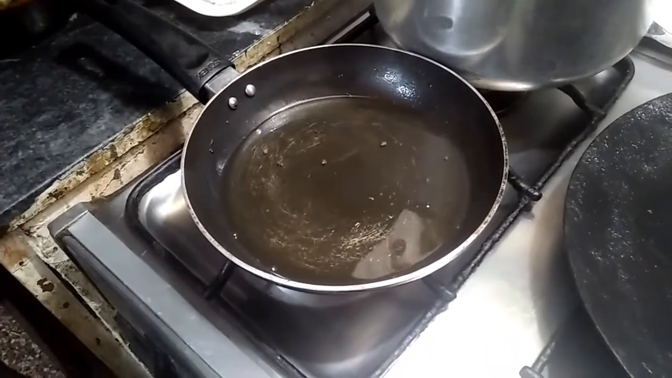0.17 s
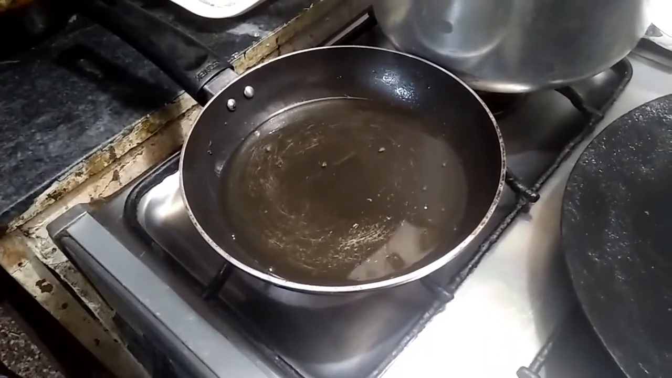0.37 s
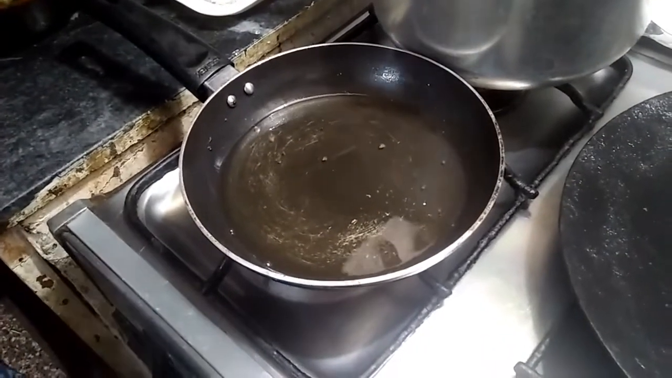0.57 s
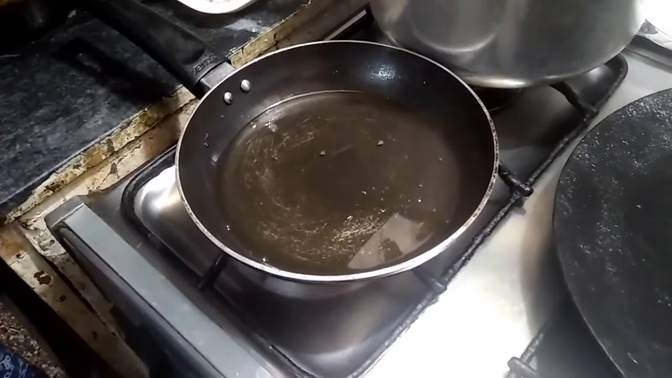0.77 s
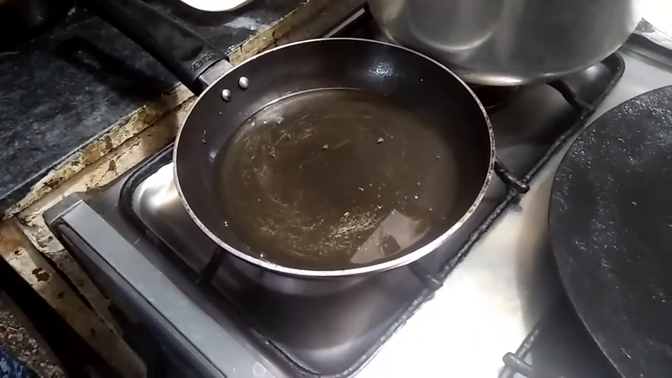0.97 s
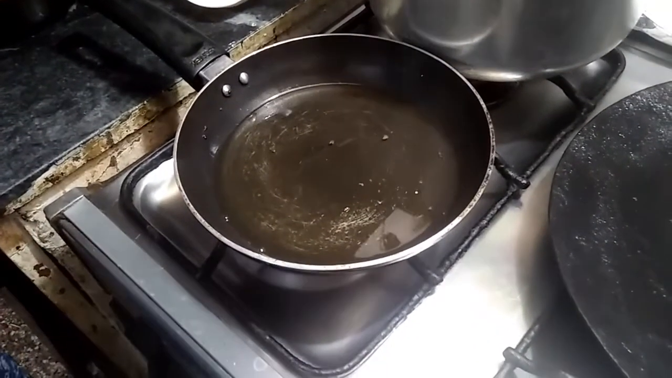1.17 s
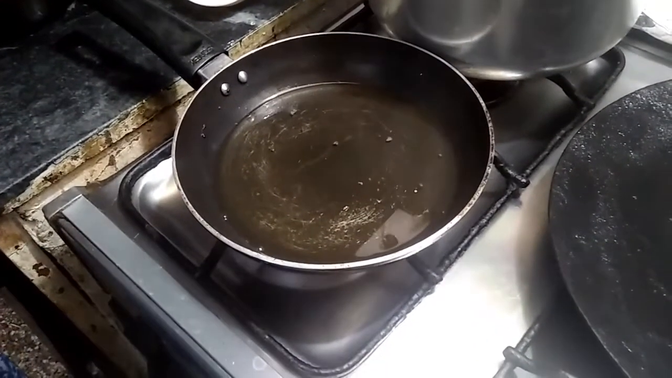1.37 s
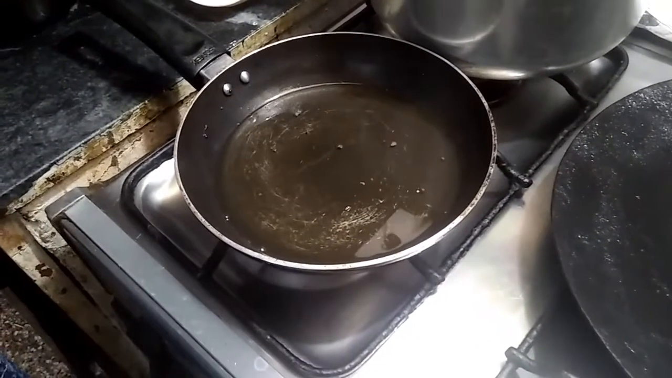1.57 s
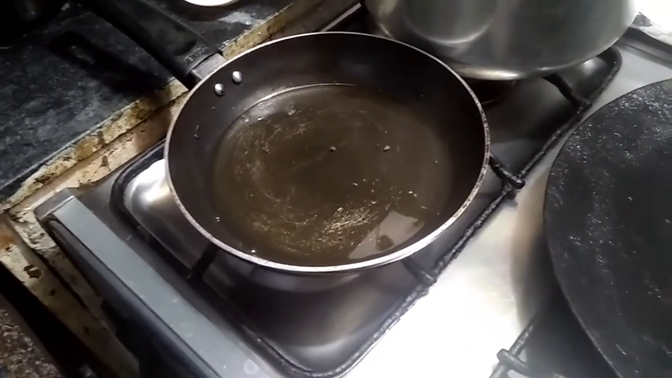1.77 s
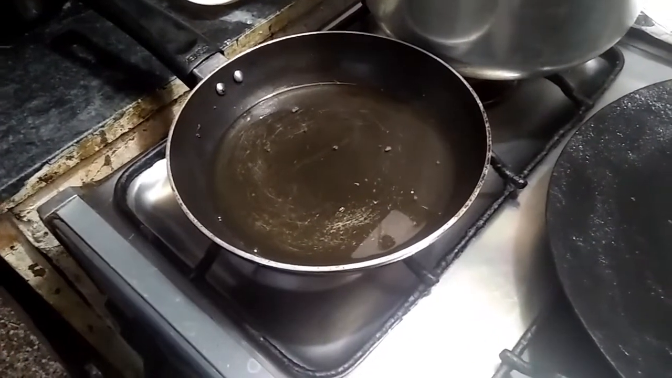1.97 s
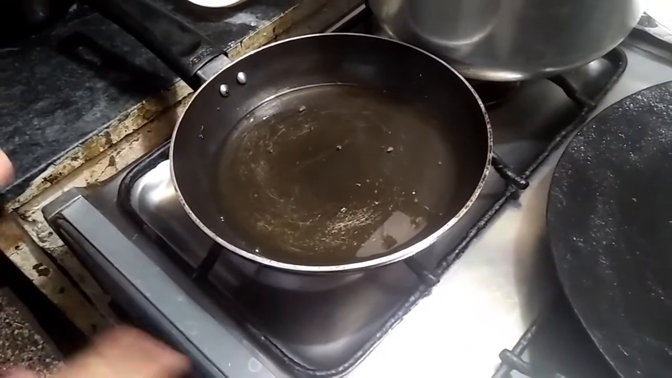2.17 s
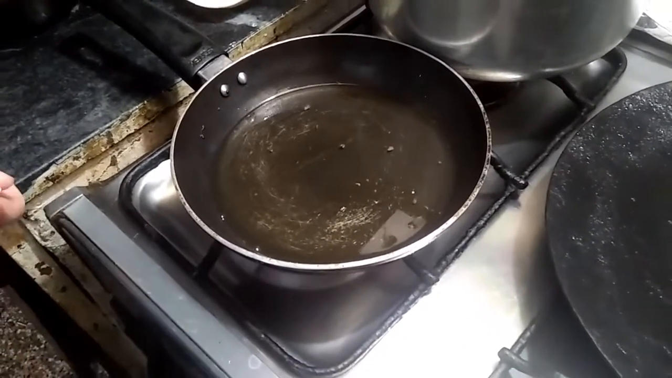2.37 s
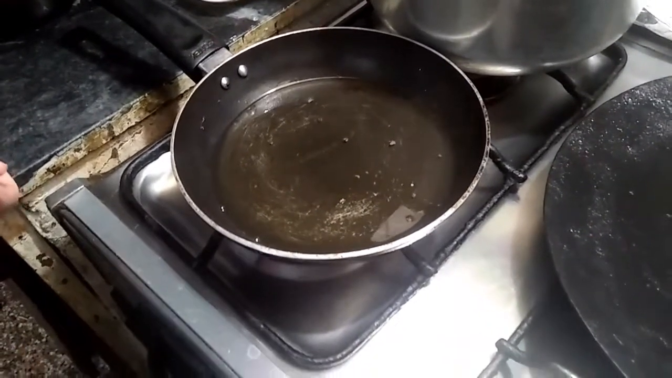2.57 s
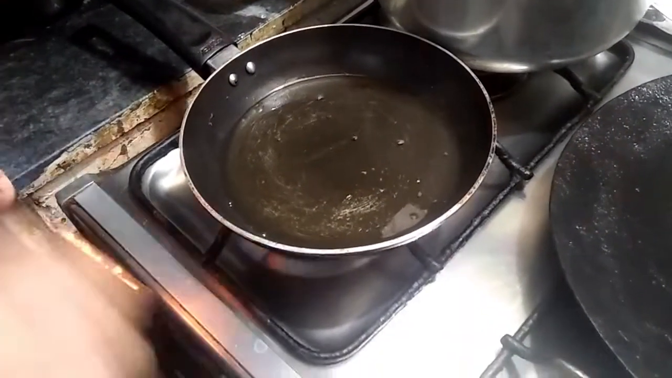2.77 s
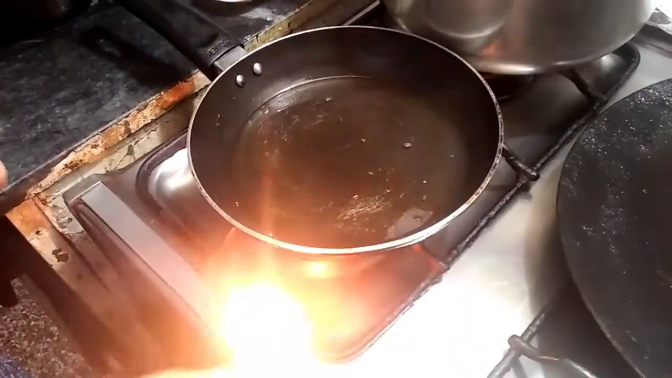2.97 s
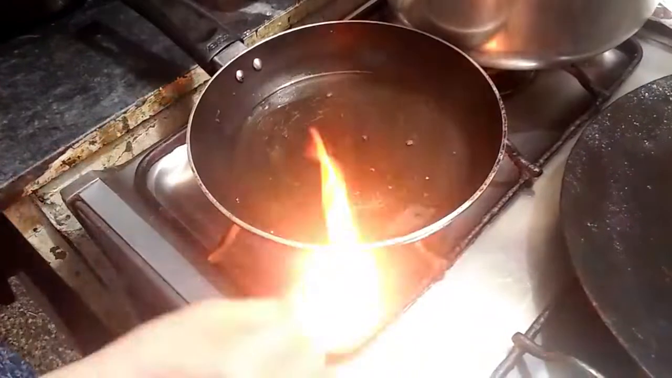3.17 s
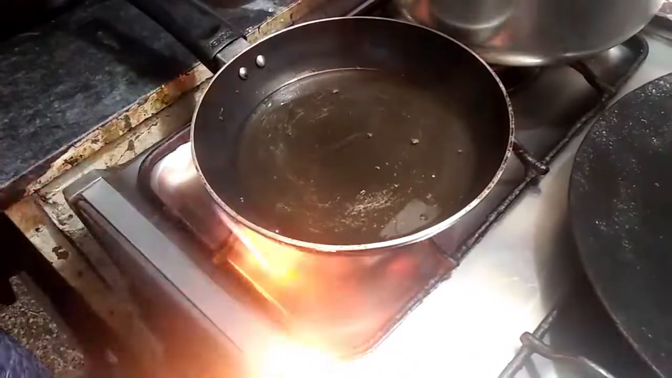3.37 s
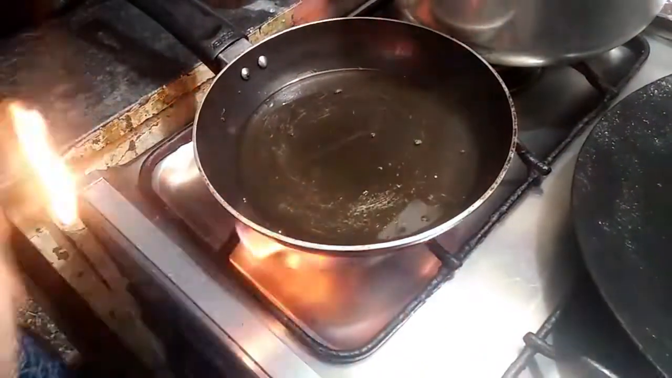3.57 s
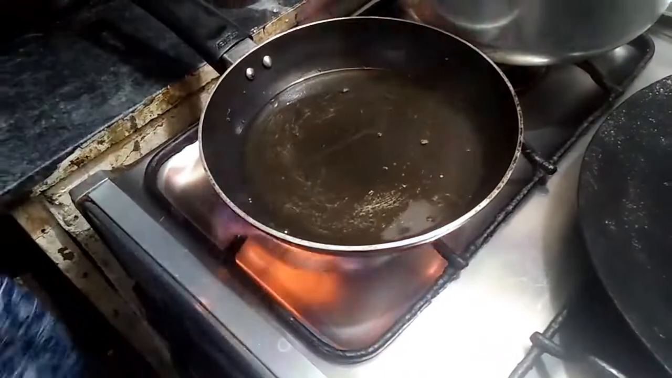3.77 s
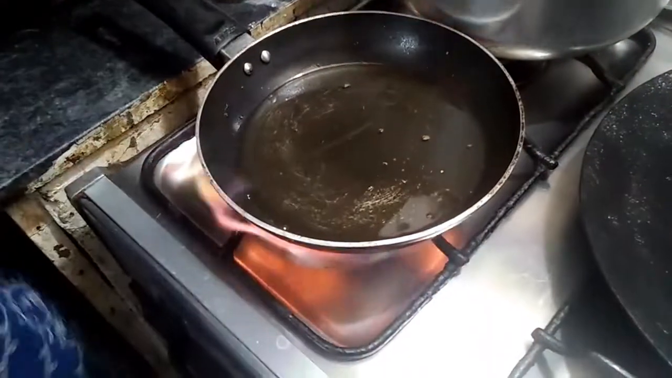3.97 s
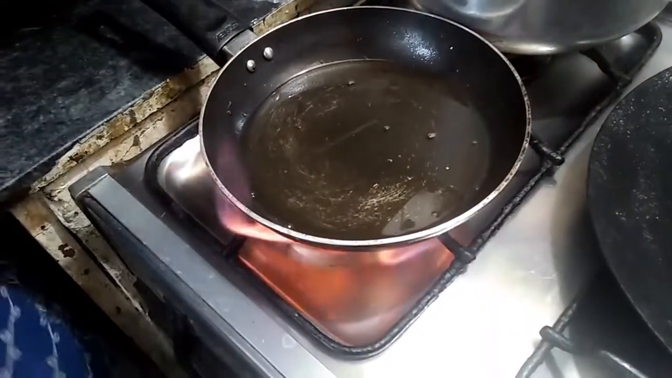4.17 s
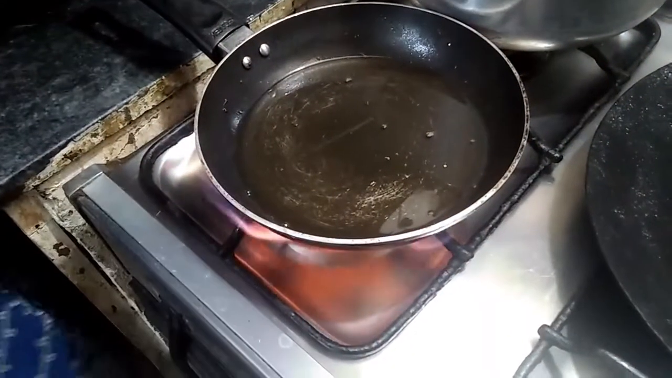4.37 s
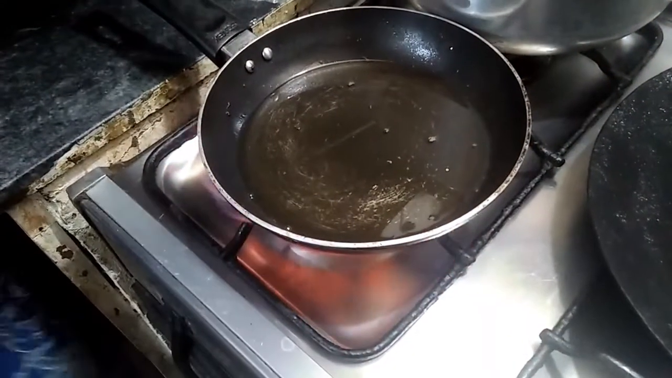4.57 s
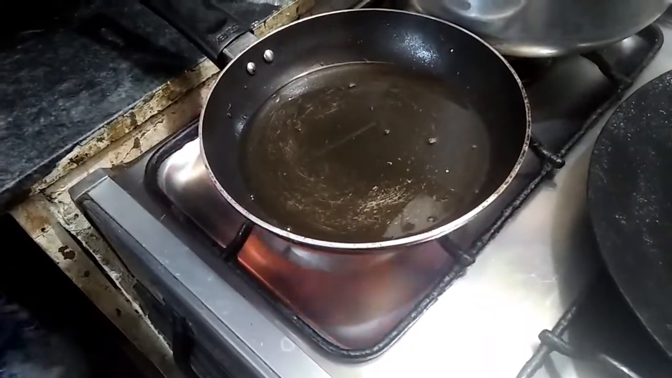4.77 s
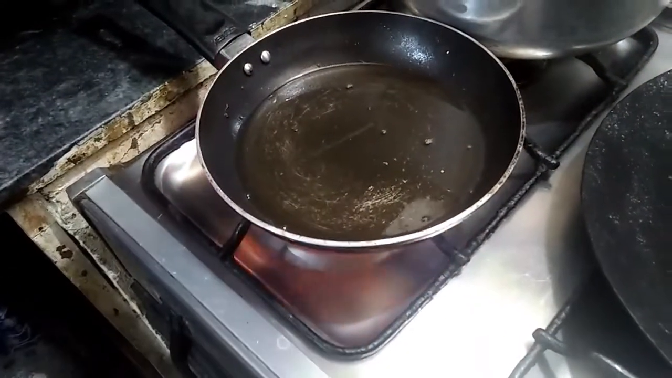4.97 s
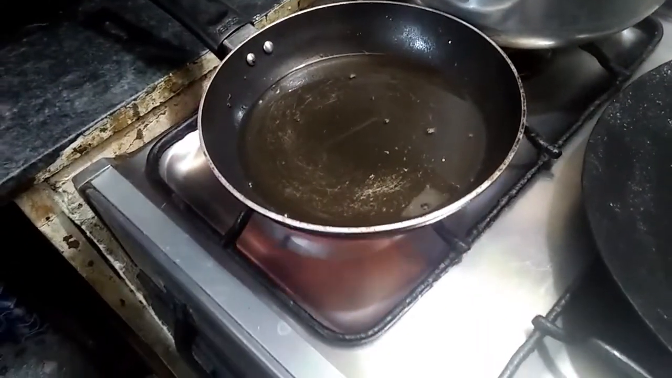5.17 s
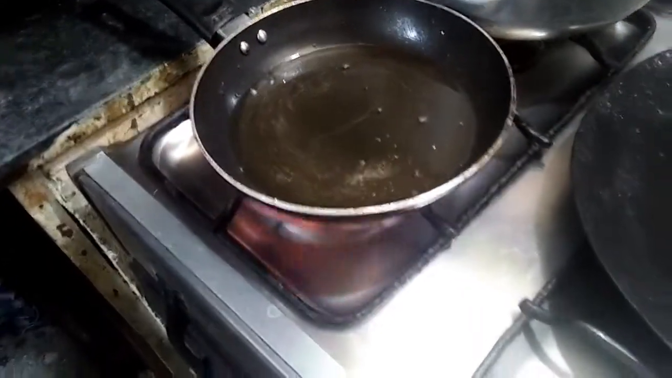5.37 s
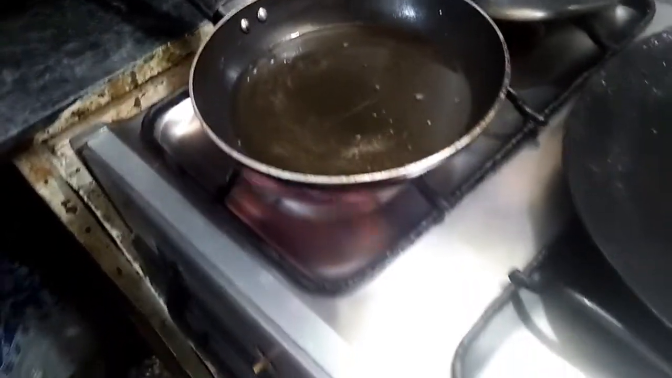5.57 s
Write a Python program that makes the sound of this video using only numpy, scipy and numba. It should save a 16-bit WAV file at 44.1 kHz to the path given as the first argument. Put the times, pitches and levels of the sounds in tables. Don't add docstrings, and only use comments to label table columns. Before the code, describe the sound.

In a small tiled kitchen, a cardboard matchbox rattles, gas hisses, a match is struck and the burner whumps alight under a pan.

```python
import sys
import numpy as np
from scipy import signal
from scipy.fft import rfft, irfft, next_fast_len
from scipy.io import wavfile
from scipy.ndimage import uniform_filter1d
from numba import njit

SR = 44100
rng = np.random.default_rng(int(sys.argv[2]) if len(sys.argv) > 2 else 0)


def natural_amplitude(level_db):
    exponent = np.asarray(level_db, float) / 20
    return 10 ** exponent


def master_out(mix):
    frames = np.transpose(np.atleast_2d(mix))
    ceiling = np.clip(frames, -1, 1)
    pcm = np.round(ceiling * 32767).astype(np.int16)
    wavfile.write(sys.argv[1], SR, pcm)


N = 247401
TIME = np.arange(N) / SR
STROKE_DROP_DB = 30


def unit(x):
    return x / np.sqrt(np.mean(x ** 2))


def noise():
    return rng.standard_normal(N)


def colour(x, points):
    hz, db = np.transpose(points)
    size = next_fast_len(len(x))
    bins_hz = np.arange(size // 2 + 1) * SR / size
    gain = natural_amplitude(np.interp(np.log(bins_hz + 1), np.log(hz), db))
    return unit(irfft(rfft(x, size) * gain, size)[:len(x)])


@njit
def svf(x, hz, width):
    y, b, l = np.empty(len(x)), 0., 0.
    for i in range(len(x)):
        g, k = np.tan(np.pi * hz[i] / SR), width / hz[i]
        v = (b + g * (x[i] - l)) / (1 + g * (g + k))
        b, l, y[i] = 2 * v - b, l + 2 * g * v, k * v
    return y


def band(x, hz, width):
    return signal.lfilter(*signal.iirpeak(hz, hz / width, fs=SR), x)


def steep(x, hz, width):
    return unit(band(band(x, hz, width), hz, 2.1 * width))


def even(x, seconds, share):
    return unit(x / uniform_filter1d(np.abs(x), int(seconds * SR)) ** share)


def walk(rate):
    k = max(int(SR / rate), 20)
    held = rng.standard_normal(N // 20)[np.arange(N) // k]
    return unit(uniform_filter1d(uniform_filter1d(held, k), k))


def mottled(x, low_hz, depth_db, rate):
    centres = low_hz * 1.25 ** np.arange(5)
    return unit(sum(natural_amplitude(depth_db * walk(rate)) * band(x, hz, hz / 5) for hz in centres))


def curve(rows, column, silent):
    rows = np.array(rows)
    out = np.full(N, 1. * silent)
    inside = (TIME >= rows[0, 0]) & (TIME <= rows[-1, 0])
    out[inside] = np.interp(TIME[inside], rows[:, 0], rows[:, column])
    return uniform_filter1d(out, size=40)


def place(out, s, sound):
    start = int(s * SR)
    out[start:start + len(sound)] += sound[:N - start]


def hump(peak_s, rise_s, fall_s):
    early = TIME < peak_s
    away = np.where(early, (peak_s - TIME) / max(rise_s, .003), (TIME - peak_s) / max(fall_s, .003))
    return -STROKE_DROP_DB * away ** np.where(early, 2.12, 1.26)


# peak t/s, rise t/s, fall t/s, level/dB, coarse grit level/dB
STROKES = [(.055, .008, 0.035, -64.5, -5), (.115, 0.047, 0.13, -59, -9), (0.188, 0.0094, 0.036, -36.5, -4.5),
           (.24, 0.11, 0.28, -48, 0), (.3, 0.16, 0.071, -47, -16), (.37, 0.02, 0.034, -65, -1),
           (.49, 0.049, 0.3, -65, -8), (0.537, 0.022, 0.23, -50, -1.5), (0.592, 0.039, 0.021, -55, 11),
           (.61, .015, 0.068, -68, 0), (.707, .008, .06, -56, -3), (0.733, 0.033, 0.07, -46.5, -4),
           (.775, 0.077, 0.16, -45.5, -2.5), (.83, 0.035, 0.093, -48, -5), (.88, 0.11, 0.019, -57.5, -10),
           (2.142, 0.03, 0.14, -45, -5), (2.199, 0.1, 0.066, -44, -0.5), (2.27, 0.046, 0.27, -56.5, -3),
           (3.391, 0.049, 0.087, -46, -1.5), (4.04, 0.035, 0.14, -52, -9), (4.099, 0.037, 0.27, -45.5, -19),
        (4.209, 0.01, 0.07, -67, -7), (4.232, 0.028, .025, -60, -9), (4.27, .04, 0.19, -63.5, -6),
        (4.333, 0.035, 0.057, -55.5, -2), (4.42, 0.11, 0.041, -58, -6), (4.49, 0.11, 0.11, -54, -4.5),
        (4.8, 0.062, .1, -57.5, -3.5), (4.84, 0.14, 0.2, -51.5, -6.5), (4.922, 0.095, 0.11, -45, -10.5),
        (4.97, 0.1, 0.076, -49, -2), (5.02, 0.078, 0.13, -56, -1), (5.123, 0.021, 0.17, -54.5, -12),
        (5.16, .04, 0.026, -66, -7), (5.35, 0.043, 0.14, -58.5, -9)]


def effort(lingers, gritty, head_db=0):
    head_grit_db = -3 + curve(FIZZ, column=2, silent=0)
    power = natural_amplitude(head_db + curve(FIZZ, column=1, silent=-120) + gritty * head_grit_db) ** 2
    for s, rise_s, fall_s, db, grit_db in STROKES:
        near = slice(max(int((s - .3) * SR), 0), int((s + .5) * SR))
        stroke_db = hump(s, rise_s, fall_s * lingers)[near]
        power[near] += natural_amplitude(db + gritty * grit_db + stroke_db) ** 2
    return np.sqrt(power)


# f/Hz, level/dB
FINE_COLOUR = [(5500, -31), (6800, -9.5), (8000, -1.5), (9700, 2), (11600, -6), (14200, -12.5),
               (16000, -29)]
# f/Hz, level/dB
COARSE_COLOUR = [(2400, -44.5), (2950, 7), (4400, 9), (5600, 4), (6700, 8), (7700, -6), (9600, -41)]
# t/s, share
FLARE = [
    (2.93, .1),
    (3.0, .95),
    (3.34, 0.73),
    (3.37, 0.11),
    (3.45, 1),
    (5.6, 0.36),
]
# t/s, lid f/Hz, lid level/dB, hollow level/dB
GRIP = [(0, 1900, 2.5, -3), (.5, 1900, 0, -33), (.6, 2010, 4.5, -9), (.72, 1990, 0, -24),
        (.9, 1710, 0, -21), (2.15, 1880, 7, -8.5), (2.9, 1655, 4.5, -25), (3.2, 2280, 1.5, -26),
        (3.4, 1340, -0.5, 0.5), (3.75, 2100, 1.5, -4), (4.1, 1500, 1, -25), (4.4, 1877, 3.5, -2),
        (4.9, 1616, -2, -6.5), (5.2, 1890, 6, 3.5), (5.4, 1757, 6.5, 5.5)]


def rubbing():
    grit = noise() * natural_amplitude(0.88 * walk(500))
    fine = colour(mottled(grit, low_hz=5840, depth_db=5.5, rate=24), FINE_COLOUR)
    coarse = colour(mottled(grit, low_hz=3340, depth_db=4, rate=20), COARSE_COLOUR)
    coarse = coarse - curve(FLARE, column=1, silent=0) * band(coarse, 3970, 4700)

    lid_hz = np.clip(curve(GRIP, column=1, silent=2500), 500, 4000)
    upper = svf(svf(svf(grit, lid_hz, 560.0), lid_hz, 1400.0), lid_hz, 1400.0)
    lower = svf(svf(grit, 0.686 * lid_hz, 170.0), 0.55 * lid_hz, 240.0)
    lid = unit(unit(upper) + natural_amplitude(-7.5) * unit(lower))
    hollow = steep(grit, 820, 400)

    grip_s, _, lid_db, hollow_db = np.transpose(GRIP)
    box = lid * natural_amplitude(np.interp(TIME, grip_s, lid_db)) * effort(lingers=1.31, gritty=0)
    box += hollow * natural_amplitude(np.interp(TIME, grip_s, hollow_db)) * effort(lingers=1.88, gritty=0)
    return fine * effort(0.62, 0, head_db=-6) + coarse * effort(0.62, 0.87) + box


# f/Hz, level/dB
CRACK_COLOUR = [(1650, -21), (2800, 10), (3300, -16), (3860, -11), (6090, -5), (10300, 0.5), (13400, -39),
                (14300, -24)]
# t/s, peak level/dB, ring f/Hz, treble level/dB
TICKS = [(0.1062, -55, 2110, -60), (0.1438, -42, 1930, -33), (0.168, -33, 2000, -63),
         (0.1782, -31, 1860, -36), (.1865, -48, 1760, -16.5), (.1905, -30.5, 2360, -37),
         (.2348, -46, 2500, -27), (0.259, -25, 1910, -48), (.268, -31.5, 2140, -60),
         (0.278, -53, 1900, -60), (.2967, -36, 2300, -40), (.304, -45, 2340, -58), (.3548, -41, 2200, -60),
         (0.3713, -40, 2000, -57), (0.5322, -45, 1730, -50), (0.534, -47, 1770, -50),
         (0.579, -27.5, 1900, -40), (0.58, -37, 1110, -60), (0.5867, -28.5, 2420, -48),
         (0.593, -30, 2460, -51), (0.702, -41, 2070, -50), (.7129, -37, 1590, -50),
         (0.7713, -36, 1800, -30), (.778, -41, 1900, -50), (2.157, -30, 2180, -50),
         (2.1658, -36, 2320, -20), (2.2059, -36, 2220, -17), (3.5718, -46, 1480, -34),
         (4.024, -43, 2200, -44), (4.0472, -38, 1970, -56), (4.0975, -37, 1420, -23),
         (4.107, -43, 1400, -29), (4.114, -38, 1480, -50), (4.12, -39, 1350, -58), (4.2058, -40, 1970, -39),
         (4.328, -34.5, 1460, -61), (4.3825, -37.5, 2040, -60), (4.4457, -45, 1100, -37),
         (4.4905, -39, 1520, -40.5), (4.834, -41, 1540, -26.5), (4.8415, -35, 1520, -58),
         (4.855, -35, 1520, -58), (4.8877, -41, 1450, -60), (4.9153, -35, 1420, -30),
         (4.9539, -31, 1520, -40), (4.9599, -37, 1500, -29.5), (5.1178, -36, 1430, -33),
         (5.1203, -36.5, 2070, -45), (5.337, -39.5, 1460, -65), (5.362, -40.5, 1530, -54.5)]


def ticks():
    out, t = np.zeros(N), TIME[:6000]
    t60_s, ref_hz, blow = 0.071, 1900, 12.7
    chance = rng.standard_normal((len(TICKS), 2, len(t)))
    for (s, peak_db, hz, treble_db), (push, crack) in zip(TICKS, chance):
        fade = np.minimum(t / 0.00029, 1) * natural_amplitude(-60 * t / t60_s * (hz / ref_hz) ** 0.96)
        push = push * fade + blow * (t == 0)
        ring = band(band(band(push, hz, 1650), hz, 860), hz, 210)
        top = colour(crack, CRACK_COLOUR) * fade ** 0.38
        place(out, s, natural_amplitude(peak_db) * ring / np.abs(ring).max() + natural_amplitude(treble_db - 21.5) * top)
    return out


# t/s, peak level/dB, f/Hz, t60 t/s
SNAPS = [(.1437, -56, 5470, .02), (.180, -29, 10500, 0.013), (.1868, -24, 10600, 0.01),
         (0.1903, -34, 9600, .02), (0.233, -29, 8200, .02), (.234, -37, 12500, 0.018),
         (0.296, -38.5, 5160, 0.076), (.356, -50, 5000, .03), (0.373, -52, 5000, .012),
         (0.5324, -40, 5100, .035), (0.585, -31, 9600, 0.011), (0.719, -49, 4260, .02),
         (0.726, -48, 9400, 0.034), (2.122, -42, 4170, 0.074), (2.156, -33.5, 4560, 0.022),
         (2.166, -31, 8600, .015), (2.2059, -30, 9000, .015), (2.858, -40, 9400, 0.046),
         (3.098, -38, 9000, .012), (3.235, -47, 5500, .012), (3.2645, -42, 5200, .015),
         (4.0913, -49, 3780, 0.37), (4.0913, -40, 7350, .02), (4.0922, -32.5, 9050, .03),
         (4.208, -36.5, 9000, 0.027), (4.4456, -40, 8400, .02), (4.4917, -32, 9300, 0.024),
         (4.833, -34, 9200, 0.022), (5.1175, -55, 3850, 0.16), (4.9, -42.5, 6450, 0.32),
         (4.915, -44, 10100, .1), (5.365, -56.5, 5500, .012)]


def snaps():
    out, t = np.zeros(N), TIME[:4000]
    for (s, peak_db, hz, t60), chance in zip(SNAPS, rng.standard_normal((len(SNAPS), len(t)))):
        snap = steep(chance, hz, 0.16 * hz) * natural_amplitude(-60 * t / t60) * np.minimum(t / 0.00042, 1)
        place(out, s, natural_amplitude(peak_db) * snap / np.abs(snap).max())
    return out


# peak t/s, f/Hz, peak level/dB, fall t/s
SWELLS = [(.055, 1710, -56, 0.015), (.063, 1570, -51, 0.0073), (.1465, 1900, -43, 0.0074),
          (.169, 1970, -42, .007), (.182, 1925, -30.5, .012), (.184, 1160, -39, 0.016),
          (.278, 1900, -48, 0.0047), (.306, 2270, -41, 0.0082), (.313, 2220, -46, 0.0053),
          (.539, 1800, -40, 0.0087), (.552, 1790, -45, 0.015), (.569, 1930, -49, .008),
          (.582, 2540, -33, .006), (.597, 2480, -32, 0.0086), (.703, 1020, -48, .008),
          (.773, 1940, -31, 0.017), (.86, 1270, -44, .014), (1.662, 794, -48, 0.01),
          (1.873, 2100, -43, 0.0064), (3.573, 1446, -39, 0.0079), (3.971, 427, -45.5, 0.018),
          (4.069, 1800, -46, 0.011), (4.108, 1410, -31.5, 0.0074), (4.131, 1360, -41, .008),
          (4.28, 2000, -44.5, 0.014), (4.33, 1890, -42, 0.018), (4.6, 2000, -51, 0.014),
          (4.688, 2040, -45.5, 0.011), (4.768, 2070, -45, 0.013), (4.85, 1500, -41, 0.0073),
          (4.911, 780, -40.5, 0.0097), (4.958, 1900, -38, .014), (4.962, 785, -37, 0.011),
          (5.458, 2100, -46, 0.013)]
# peak t/s, f/Hz, peak level/dB, fall t/s
WHUMP = [
    (3.36, 76, -29, .045),
    (3.383, 102, -33, .04),
    (3.403, 62, -22, .062),
    (3.403, 44, -33, .09),
    (3.468, 72, -41, .07),
]


def swells(rows, rise_share, sag):
    out = np.zeros(N)
    for s, hz, db, fall_s in rows:
        near = slice(int((s - 2 * fall_s) * SR), int((s + 2 * fall_s) * SR))
        t = TIME[near] - s
        away = np.where(t < 0, -t / rise_share, t) / fall_s
        swing = np.cos(2 * np.pi * hz * t * (1 - sag * t / fall_s))
        out[near] += natural_amplitude(db - STROKE_DROP_DB * away ** 2) * swing
    return out


# t/s, level/dB
STRIKE = [(2.8495, -77), (2.8502, -14), (2.8535, -17.5), (2.856, -8), (2.859, -10), (2.8605, -13),
          (2.864, -11.5), (2.868, -22), (2.878, -32.5), (2.92, -38.5), (3.0, -48)]
# f/Hz, level/dB
STRIKE_COLOUR = [(290, -67), (500, -103.5), (910, -14.5), (1240, -14.5), (1420, -9.5), (1780, -1.5),
                 (2730, -12), (3280, -23.5), (4360, -23), (5330, -23), (9280, -12), (12000, -22.5),
                 (14000, -16.5), (15100, -42)]
# f/Hz, width f/Hz, level/dB
BOX_RING = [(1500, 150, -12.5), (1793, 53, -8.5), (1939, 150, -3)]


def strike():
    rasp = noise() * natural_amplitude(0.77 * walk(600))
    ring = sum(natural_amplitude(db) * steep(rasp, hz, width) for hz, width, db in BOX_RING)
    scrape = colour(rasp, STRIKE_COLOUR) + natural_amplitude(0.5) * unit(ring)
    scrape = even(scrape, seconds=0.0024, share=0.72)
    return scrape * natural_amplitude(curve(STRIKE, column=1, silent=-140))


# t/s, level/dB, coarse grit level/dB, hiss level/dB, sizzle level/dB
FIZZ = [(2.872, -35, -12, -3, -9), (2.9, -36.5, -13, -6, -26), (2.98, -44.5, -16, -6.5, -14),
        (3.04, -50, -10, -4.5, -12), (3.1, -52, -2.5, -0.5, -10), (3.17, -50, -4, -2, -2),
        (3.28, -51.5, -7, -3, -14), (3.45, -59, -16, 0, -14), (3.51, -58.5, -4, 1, 4),
        (3.57, -58, -11, 3, -1), (3.75, -59, -17, -3, -5.5), (3.96, -75.5, -13, -22, -1)]


def spit():
    crackle = noise() * natural_amplitude(2.4 * walk(400) + 1.0 * walk(68))
    crackle = mottled(crackle, low_hz=4990, depth_db=3.2, rate=17)
    hiss_db = curve(FIZZ, column=3, silent=0) + 1.4 * walk(20)
    sizzle_db = curve(FIZZ, column=4, silent=0) + 1.5 * walk(12)
    roar_db = curve(FIZZ, column=2, silent=0) + 2.8 * walk(12)
    hiss = natural_amplitude(hiss_db) * steep(crackle, 9340, 2200)
    sizzle = natural_amplitude(sizzle_db) * steep(crackle, 10900, 1800)
    roar = natural_amplitude(roar_db) * steep(band(crackle, 5700, 2800), 5660, 1500)
    return (hiss + sizzle + roar) * natural_amplitude(curve(FIZZ, column=1, silent=-120))


def boom(hz, waver, rough_db, churn):
    pitch_hz = hz * (1 + waver * walk(30))
    swing = np.sqrt(2) * np.sin(2 * np.pi * np.cumsum(pitch_hz) / SR)
    air = even(steep(noise(), 1.15 * hz, .9 * hz), seconds=.05, share=.8)
    return unit(natural_amplitude(rough_db * walk(35)) * (swing + churn * air))


# peak t/s, flutter level/dB, oven boom level/dB, deep boom level/dB, rise t/s
PUFFS = [(1.42, -88, -61, -64, 0.026), (1.681, -50, -54.5, -48.5, 0.026), (2.11, -80, -67, -64, 0.056),
         (2.7, -80, -63, -69, 0.08), (2.874, -40, -47, -50, 0.021), (3.24, -71, -46, -49, 0.01),
         (3.295, -65, -58, -55, .03), (3.373, -28.5, -24.5, -42, 0.046), (3.918, -85, -61, -59, .015),
         (3.975, -54, -64, -59, 0.015), (4.11, -80.5, -66.5, -65, 0.056), (4.33, -82, -69, -66.5, 0.13),
         (4.88, -85, -75, -66.5, 0.069)]


def gust(column, late_s, blast_s):
    power = 0
    for row in PUFFS:
        t = TIME - row[0] - late_s
        rise_db = STROKE_DROP_DB * (np.clip(-t, 0, 1) / row[4]) ** 2.9
        blast_db = 12.5 * np.clip(t / blast_s, 0, 1) ** 2
        settle_db = 110.5 * np.clip(t - blast_s, 0, None)
        power = power + natural_amplitude(row[column] - rise_db - blast_db - settle_db) ** 2
    return np.sqrt(power)


# f/Hz, width f/Hz, level/dB
CAVITY = [(139, 25, -22), (288.4, 51, -1), (455, 60, -1), (572.8, 15.8, -3.5), (673, 40, -8.5),
          (864, 55, -8.5), (1022, 70, -7.5), (1365, 100, -4.5), (1520, 140, -7.5)]
# f/Hz, level/dB
FLUTTER_COLOUR = [(120, -20), (200, -8), (381, -0.5), (660, 1.5), (869, -5), (997, 2.5), (1130, -2.5),
                  (1600, -16.5), (2000, -30.5), (2500, -15.5), (3250, -49.5), (5500, -120)]


def puffs():
    deep = boom(hz=63, waver=0.076, rough_db=-2.5, churn=0.89)
    oven = boom(hz=140.5, waver=0.03, rough_db=0.5, churn=0.41)
    push = noise() * natural_amplitude(0.87 * walk(83))
    rings = 0
    for hz, width, db in CAVITY[1:]:
        rings = rings + natural_amplitude(db) * even(steep(push, hz, width), seconds=0.16, share=0.91)
    flutter = unit(unit(rings) + 1.2 * colour(push, FLUTTER_COLOUR))
    out = flutter * gust(column=1, late_s=0, blast_s=0.053)
    out += oven * gust(column=2, late_s=-0.0053, blast_s=0.03)
    return out + deep * gust(column=3, late_s=0.037, blast_s=0.0444)


# t/s, level/dB
FLOW = [(1.866, -69), (1.877, -52), (1.881, -45), (1.9, -37), (2.85, -38.5), (3.0, -43.5), (3.2, -45.5),
        (3.31, -49), (3.45, -57.5), (3.6, -55.5), (5.61, -55)]
# f/Hz, level/dB
JET_COLOUR = [(180, -49.5), (300, -16.5), (370, -28.5), (673, -9.5), (993, -15.5), (1260, -19.5), (2050, 3),
              (3030, -14), (3340, -21.5), (3750, -59), (4500, -44), (5300, -38), (10000, -32), (14300, -41)]
# f/Hz, width f/Hz, level/dB
TUBE = [(960, 76, -2), (1814, 240, 1), (2026, 100, 5), (2644, 77, -8), (3260, 100, -8), (5920, 430, -17),
        (7400, 300, -26), (8500, 470, -15), (11700, 260, -16)]
LIT_S = 3.1


def gas():
    jet = even(colour(noise() * natural_amplitude(1.3 * walk(150)), JET_COLOUR), seconds=0.04, share=0.61)
    unopened = np.clip((1.94 - TIME) / .07, 0, 1)
    tube = 0
    for hz, width, db in TUBE:
        lit_db = -10.5 * (hz > 5000) * (TIME > LIT_S)
        opening_db = -18 * (hz > 3000) * unopened
        mode = even(steep(noise(), hz, width), seconds=.05, share=0.19)
        tube = tube + natural_amplitude(db + 1.8 * walk(22.98) + lit_db + opening_db) * mode
    mix = unit(jet * natural_amplitude(0.6 * walk(26.77)) + natural_amplitude(-2.5) * unit(tube))
    return mix * natural_amplitude(curve(FLOW, column=1, silent=-120))


def flame():
    tone = steep(noise(), hz=2100, width=30) * natural_amplitude(-64 + 2.0 * walk(11))
    return tone * np.clip((TIME - LIT_S) / 0.44, 0, 1)


# t/s, level/dB, f/Hz rung most, spread/octaves, t60 t/s
THUDS = [(0, -57, 985, 0.45, 0.29), (.052, -52, 1630, 0.12, 0.11), (1.211, -63, 438, 0.24, 0.34),
         (1.221, -61, 1900, 0.13, .3), (1.39, -57.5, 1800, 0.26, 0.15), (1.385, -51, 490, 0.2, 0.074),
         (1.415, -58, 258, 0.73, 0.54), (1.659, -45.5, 447, 0.65, 0.22), (1.658, -51, 1250, 0.18, 0.1),
         (1.661, -45, 715, 0.23, 0.38), (1.676, -44.5, 298, 0.88, 0.34), (1.694, -62, 400, 0.9, 0.36),
         (2.071, -49, 436, 0.56, 0.26), (2.268, -48, 300, 0.17, 0.12), (3.226, -44.5, 257, 0.22, 0.25),
         (3.966, -49, 606, 0.91, 0.08), (4.018, -47, 536, 0.23, 0.12), (4.19, -54.5, 636, 0.28, 1)]


def thuds():
    out, t = np.zeros(N), TIME[:SR // 3]
    turns = rng.random((len(THUDS), len(CAVITY)))
    shakes = rng.standard_normal((len(THUDS), len(t)))
    for (s, db, centre_hz, spread, t60), turn, shake in zip(THUDS, turns, shakes):
        knock = natural_amplitude(-6.5) * steep(shake, centre_hz, centre_hz * spread) * natural_amplitude(-60 * t / t60)
        for (hz, _, mode_db), phase in zip(CAVITY, turn):
            reach_db = -6 * (np.log2(hz / centre_hz) / spread) ** 2
            fade_db = -60 * t / t60 * hz / centre_hz
            knock += natural_amplitude(mode_db + reach_db + fade_db) * np.sin(2 * np.pi * (hz * t + phase))
        place(out, s, natural_amplitude(db) * np.minimum(t / 0.0032, 1) * knock)
    return out


# t/s, f/Hz, level/dB,
# t60 t/s
PINGS = [(2.8575, 9350, -19, .11), (2.8505, 13600, -26, .025), (2.115, 4300, -52, .18),
         (.583, 10000, -41, .04), (4.099, 1345, -40, .16), (4.113, 1400, -32, .12), (4.047, 2090, -44, .3),
         (4.485, 9400, -46, .06), (4.878, 6600, -54, .4), (5.02, 8800, -62, .14), (5.128, 8750, -48, .16),
         (5.14, 11000, -56, .1)]


def pings():
    out, t = np.zeros(N), TIME[:SR // 3]
    for s, hz, db, t60 in PINGS:
        beat = natural_amplitude(3 * walk(90)[:len(t)] - 60 * t / t60)
        attack = np.minimum(t / 0.00043, 1)
        place(out, s, attack * natural_amplitude(db) * beat * np.sin(2 * np.pi * hz * t))
    return out


def walls(near):
    t = TIME[:SR // 2]
    tail = rng.standard_normal(len(t)) * natural_amplitude(-60 * t / 0.16) * (t > .004)
    tail = signal.lfilter(*signal.butter(2, 500, "high", fs=SR), tail)
    return natural_amplitude(-10.5) * signal.fftconvolve(near, tail / np.sqrt(np.sum(tail ** 2)))[:N]


# f/Hz, level/dB
KITCHEN = [(15, -31.5), (30, -16), (48, -3.5), (64, -17), (85, -9.5), (115, -21), (230, -25), (370, -22.5),
           (600, -14.5), (900, -16), (1500, -17.5), (2000, -23), (2600, -29), (6000, -37), (10000, -37),
           (14300, -43)]
# f/Hz, width f/Hz, level/dB
DRONE = [(148, 14.3, -72.5), (304, 41, -75.5), (442, 40, -73.5), (745, 63, -92.5)]


def kitchen():
    out = colour(noise(), KITCHEN) * natural_amplitude(-63.5 + .7 * walk(4))
    for hz, width, db in DRONE:
        out += natural_amplitude(db + walk(1.9)) * even(steep(noise(), hz, width), seconds=0.14, share=0.25)
    return out


def scene():
    near = rubbing() + ticks() + snaps() + swells(SWELLS, rise_share=0.39, sag=0.0089)
    near += strike() + spit()
    near += puffs() + swells(WHUMP, rise_share=0.92, sag=.03)
    near += gas() + flame() + thuds() + pings()
    mid = near + walls(near) + kitchen()
    return np.array([mid, mid])


def wander(mid):
    hz, _, cells = signal.stft(mid, SR, nperseg=2048, noverlap=1024)
    blocks = cells.shape[1]
    strip = (hz // 1000).astype(int)
    chance = rng.random((blocks, strip.max() + 1))[:, strip].T
    power = np.abs(cells) ** 2
    treble_db = 10 * np.log10(power[hz > 4000].sum(axis=0) / power[hz > 500].sum(axis=0))
    share = np.clip((hz[:, None] - 3900) / 4000, 0, 1) * np.clip(.85 + treble_db / 45, .2, .75)
    group = np.arange(len(hz)) // 8
    scatter = np.exp(2j * np.pi * rng.random((blocks, len(hz) // 8 + 1))[:, group].T)
    side = signal.istft(cells * (chance < share) * scatter, SR, nperseg=2048, noverlap=1024)[1]
    return natural_amplitude(-5.5) * side[:N]


def roll_off(x):
    return signal.sosfilt(signal.butter(12, 15220, fs=SR, output="sos"), x)


def record(dry):
    low_pass = signal.ellip(10, .2, 48, 14250, fs=SR, output="sos")
    mid = signal.sosfilt(low_pass, np.clip(dry[0], -.84, .84))
    side = wander(mid)
    mix = np.clip([mid + side, mid - side], -.9, .9)
    return roll_off(mix)


dry = scene()
out = record(dry)
master_out(out)
```